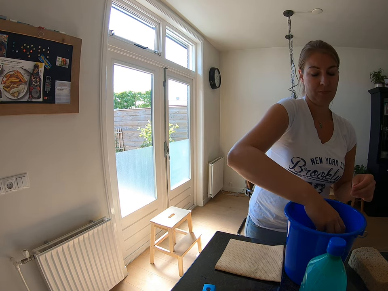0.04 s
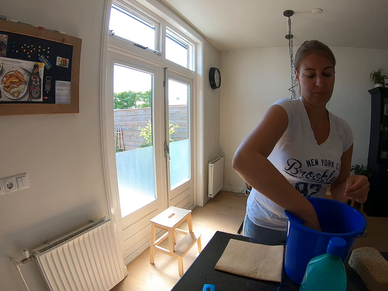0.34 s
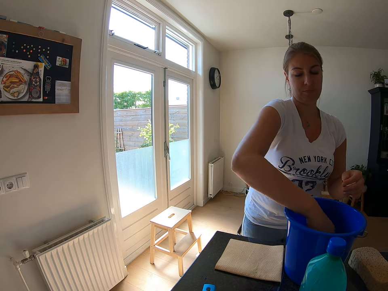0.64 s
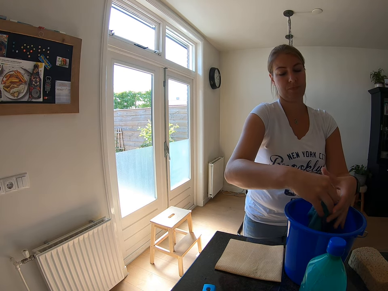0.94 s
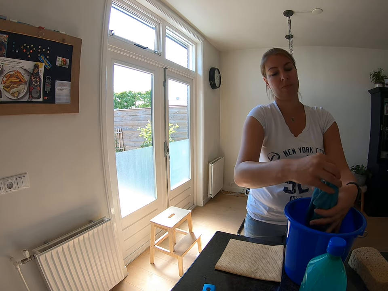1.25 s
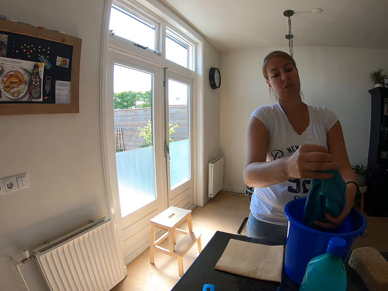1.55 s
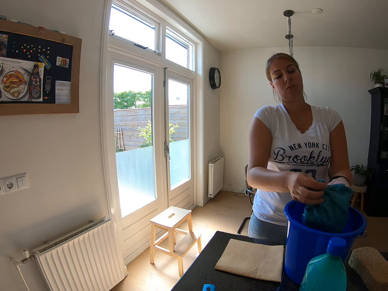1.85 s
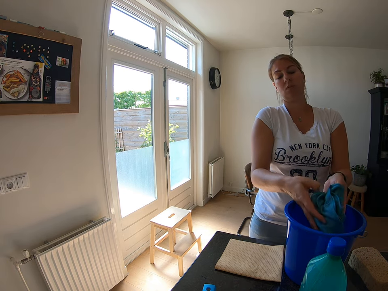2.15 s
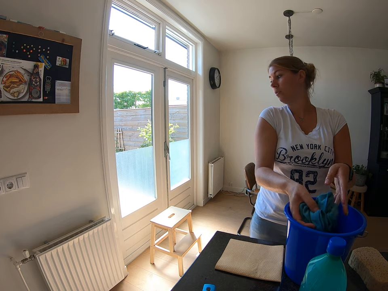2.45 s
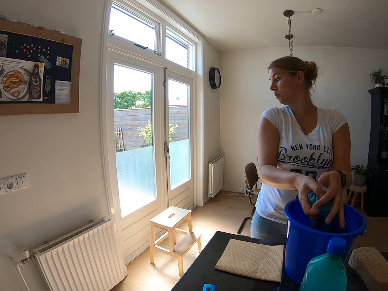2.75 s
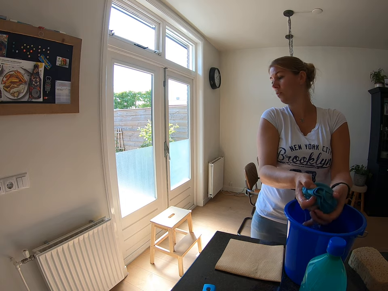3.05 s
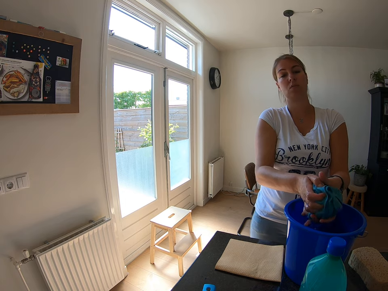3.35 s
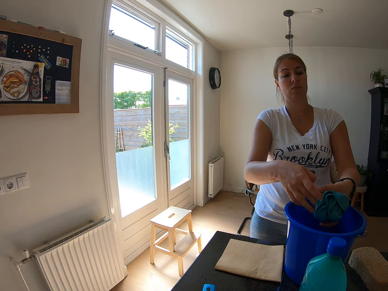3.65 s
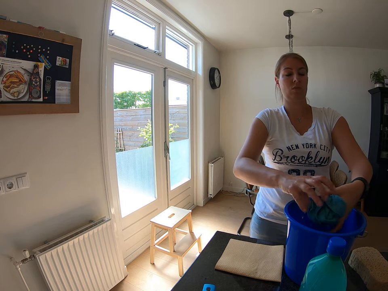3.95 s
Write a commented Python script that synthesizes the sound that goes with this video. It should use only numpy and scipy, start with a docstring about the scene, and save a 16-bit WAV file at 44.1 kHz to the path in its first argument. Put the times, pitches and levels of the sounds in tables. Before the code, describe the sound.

Squelching, bubbling and dripping come from a cloth being swished, raised and wrung over a plastic bucket. The nudged bucket gives low booms on a table, slightly to the right, in a faintly echoing room.

```python
"""First you hear squelching and plopping: a wet cloth is stirred in a plastic bucket of water.
The cloth is then grabbed, lifted, gathered and squeezed. Trapped air rings as bubbles, swarms of tiny
ones make the squelch, and drops slap the surface. The bucket booms on the table when it is pushed.
It stands to the right of the microphones, in a hard-walled room with a faint steady rumble and hiss."""
import sys
import numpy as np
from scipy import signal
from scipy.fft import rfft, irfft
from scipy.io import wavfile
from scipy.ndimage import uniform_filter1d

SR = 44100
rng = np.random.default_rng(int(sys.argv[2]) if len(sys.argv) > 2 else 0)


def int16_out(signal):
    """Quantize to a 16-bit WAV file."""
    q = np.round(np.clip(np.atleast_2d(signal).T, -1, 1) * 32767)
    wavfile.write(sys.argv[1], SR, q.astype(np.int16))


N = 176400  # 4 seconds


def amp(db):
    """Turns decibels into a number to multiply a sound by."""
    return 10 ** (np.asarray(db) / 20)


def unit(x):
    """Scales a signal to an average size (rms) of 1."""
    return x / np.sqrt(np.mean(abs(x) ** 2) + 1e-20)


def read(table, hz, column=1):
    """Looks up a frequency in a table, blending between rows on a musical (log) scale."""
    table = np.array(table)
    return np.interp(np.log(hz + 1), np.log(table[:, 0] + 1), table[:, column])


def colour(x, table):
    """Turns each frequency up or down by a table of (frequency [Hz], gain [dB])."""
    return irfft(rfft(x) * amp(read(table, np.fft.rfftfreq(N, 1 / SR))), N)


def band(x, lo_hz, hi_hz, order=2):
    """Keeps the sound between two frequencies."""
    edges = [lo_hz, min(hi_hz, SR / 2 - 100)]
    return signal.sosfilt(signal.butter(order, edges, "band", fs=SR, output="sos"), x)


def drift(hz):
    """A smooth random wander of average size 1; more hz makes it quicker."""
    keep_slow = np.exp(-(np.fft.rfftfreq(N, 1 / SR) / hz) ** 2)
    return unit(irfft(rfft(rng.standard_normal(N)) * keep_slow, N))


def add(mix, start_s, sound):
    """Mixes a sound in at a given time."""
    part = mix[max(round(start_s * SR), 0):][:len(sound)]
    part += sound[:len(part)]


# Tone of the room's background noise (frequency [Hz], relative level [dB])
ROOM_TONE = [(15, -38), (25, 0.5), (112, -5.5), (191, 9), (278, -9), (573, -19), (790, -9), (952, -19.5),
             (3260, -19), (5010, -22), (5880, -19.5), (12400, -39), (15000, -45)]

def room_tone(level_db=-56.5):
    """A faint steady rumble and hiss, different in each microphone."""
    return amp(level_db) * unit(colour(rng.standard_normal((2, N)), ROOM_TONE))


# How long the room rings (frequency [Hz], time to fade by 60 dB [s])
ROOM_DECAY = [(200, 0.53), (700, 0.33), (1400, 0.46), (4500, 0.35), (8000, 0.46), (15000, 0.32)]

def echoes(tail_db=-4.5, early_db=-5, early_decay_s=0.0041):
    """Sound bounces off the bucket and table first, then dies away between the walls."""
    t = np.arange(SR) / SR
    bounces = rng.standard_normal((2, SR)) * (rng.random((2, SR)) < .1) * (t > .008)
    hz, age, spectrum = signal.stft(bounces, SR, nperseg=256)
    fade = amp(-60 * age / read(ROOM_DECAY, hz)[:, None])
    tail = signal.istft(spectrum * fade, SR, nperseg=256)[1][:, :SR]
    early = rng.standard_normal((2, SR)) * (rng.random((2, SR)) < .06) * (t > .002)
    early *= np.exp(-t / early_decay_s)
    return sum(amp(db) * part / np.linalg.norm(part, axis=1, keepdims=True)
               for db, part in ((tail_db, tail), (early_db, early)))


# Direct sound on the left, compared with the right (frequency [Hz], gain [dB], phase shift [radians])
LEFT_MIC = [(98, -10, 11), (550, -16.5, -2), (1190, -2, -5), (1840, -8.5, -5), (3220, -3, -8),
            (5360, -4.5, -5.5), (11500, -1.5, -4.5)]

def room(direct, echoing, patterns=4, sway_s=.3):
    """Sound reaches two microphones directly, then as echoes that change as the hands and body move."""
    t, hz = np.arange(N) / SR, np.fft.rfftfreq(N, 1 / SR)
    to_left = amp(read(LEFT_MIC, hz)) * np.exp(1j * read(LEFT_MIC, hz, column=2))
    out = np.array([irfft(rfft(direct) * to_left, N), direct])
    for k in range(patterns):  # the echo patterns take turns, all of them once in every sway_s
        from_turn = (t / sway_s * patterns - k) % patterns - patterns / 2
        blend = np.cos(np.pi / 2 * np.clip(from_turn, -1, 1))
        out += signal.fftconvolve((echoing * blend)[None], echoes(), axes=1)[:, :N]
    return out


# How hard the bucket is pushed (time [s], level [dB])
PUSHES = [(0, -56), (.6, -59), (.67, -35.5), (.74, -30.5), (.9, -34.5), (1.08, -40.5), (1.22, -53),
          (1.45, -51), (1.8, -71.5), (1.885, -38.5), (2.1, -68), (2.8, -66), (2.92, -53), (3.08, -50),
          (3.17, -33), (3.33, -28.5), (3.5, -25.5), (3.62, -30.5), (3.79, -32.5), (3.95, -54.5)]
# Deep notes of the bucket and table (pitch [Hz], unsteadiness [Hz], relative level [dB],
# left compared with right [dB], growth with the push [dB per dB])
BOOM_NOTES = [(82.54, 1.83, -1, -25.5, 1), (106.5, 4.4, -11, -9, 2), (192.2, 5.1, -19, -16.5, 0.8)]

def bucket_boom(full_push_db=-25):
    """The pushed bucket booms, and the table carries this mostly to the right microphone."""
    t, out = np.arange(N) / SR, np.zeros((2, N))
    push_db = np.interp(t, *np.transpose(PUSHES)) - full_push_db
    for hz, width_hz, db, left_db, growth in BOOM_NOTES:
        pitch = hz + .5 * width_hz * drift(hz=16)
        waver = amp(np.sqrt(width_hz) * 1.2 * drift(hz=9))
        ring = unit(np.sin(2 * np.pi * np.cumsum(pitch) / SR) * waver)
        sides = amp([[left_db], [0]])
        out += sides * amp(full_push_db + db + growth * push_db) * ring
    return out


# Notes of the bucket's wall and mouth (pitch [Hz], gain of the added ring [dB])
HOLLOW_NOTES = [(194, 25.5), (360, -2), (418, -1.5), (506, 5), (578, -11), (637, -8)]

def hollow_bucket(water, width_hz=5.9):
    """The bucket's wall and the air inside it ring along with the deeper gurgles."""
    return water + sum(amp(db) * signal.lfilter(*signal.iirpeak(hz, hz / width_hz, SR), water)
                       for hz, db in HOLLOW_NOTES)


def splash(lo_hz, hi_hz, decay_s, rise_s=.0005):
    """A puff of spray: a short hiss that swells quickly and dies."""
    t = np.arange(SR // 5) / SR
    noise = rng.standard_normal(len(t))
    shape = (1 - np.exp(-t / rise_s)) * np.exp(-t / decay_s)
    return band(noise * shape, lo_hz, hi_hz, order=3) / np.std(band(noise, lo_hz, hi_hz, order=3))


def bubble(hz, decay_s, swell, rise=0.0097, wobble=0.03):
    """An air pocket rings and fades; its pitch creeps up, and wobbles as it changes shape."""
    age = np.arange(0, 10 * decay_s, 1 / SR) / decay_s  # age and swell are counted in decay times
    shape = (1 - np.exp(-(age / swell) ** 2)) * np.exp(-age)
    pitch = hz * (1 + rise * age + wobble * np.sin(2 * age + 2 * np.pi * rng.random()))
    return shape / shape.max() * np.sin(2 * np.pi * np.cumsum(pitch) / SR)


# Bubbles you can hear one by one (time [s], pitch [Hz], level [dB], decay time [s])
SINGLE_BUBBLES = [(.064, 620, -39.5, 0.004), (.073, 1153, -30, 0.0036), (.095, 2270, -34.5, 0.0027),
                  (.113, 616, -30, 0.0058), (0.123, 194.5, -45, 0.019), (.193, 640, -34, 0.0047),
                  (0.213, 5410, -37, 0.0029), (.222, 545, -45, 0.0093), (.274, 1990, -32, 0.0046),
                  (.612, 545, -42, 0.004), (.626, 498, -31, 0.005), (0.636, 393, -35, 0.0061),
                  (.659, 576, -38.5, 0.0053), (0.864, 1043, -45, 0.0073), (1.192, 4330, -40.5, 0.0022),
                  (1.206, 1216, -34, 0.0027), (1.222, 1065, -33.5, 0.0055), (1.276, 1080, -40.5, 0.0052),
                  (1.432, 4130, -43.5, .003), (1.516, 5740, -41.5, .0025), (1.749, 2686, -36, 0.0053),
                  (1.764, 3500, -40.5, .003), (1.785, 888, -46, 0.011), (1.787, 1350, -38.5, 0.0042),
                  (1.855, 3070, -48, 0.0042), (2.005, 3230, -36.5, 0.0034), (2.040, 1080, -40.5, 0.0064),
                  (2.062, 1450, -40.5, 0.003), (2.082, 2350, -36, 0.0044), (2.194, 1447, -33, 0.0039),
                  (2.195, 1745, -37, 0.0033), (2.289, 1210, -29.5, 0.0055), (2.363, 3290, -38.5, 0.0021),
                  (2.835, 3190, -44, 0.0043), (2.857, 1542, -46, 0.0074), (2.944, 1670, -40, 0.0063),
                  (2.995, 1298, -37.5, 0.0042), (3.017, 1577, -41, 0.012), (3.041, 2870, -36.5, 0.0031),
                  (3.099, 1910, -24.5, 0.0013), (3.109, 1727, -35, 0.0068), (3.134, 700, -32.5, 0.0044),
                  (3.214, 1823, -38.5, 0.006), (3.225, 2180, -37.5, 0.0031), (3.281, 1480, -38, 0.0024),
                  (3.301, 5400, -36.5, 0.005), (3.365, 2560, -35.5, 0.0015), (3.385, 582, -40.5, 0.0054),
                  (3.391, 1586, -38, 0.007), (3.423, 608, -32.5, 0.0051), (3.755, 2850, -50.5, 0.0052),
                  (3.808, 1694, -49, 0.0063), (3.823, 1457, -46.5, 0.018), (3.82, 2870, -43, 0.004)]
# Slaps and spits of water (time [s], level [dB], middle frequency [Hz], decay time [s], width [octaves])
WATER_SLAPS = [(0.102, -36, 3760, 0.0045, 1.88), (.191, -36.5, 2780, 0.0075, 0.57),
               (0.213, -37.5, 2970, 0.0072, 0.99), (.275, -35.5, 2800, 0.0073, 1.04),
               (0.285, -41, 6840, 0.0046, 1.08), (.367, -45, 4020, 0.015, 1.13),
               (0.623, -49, 645, 0.005, 1.8), (0.63, -59.5, 1310, 0.19, 0.7),
               (.842, -50.5, 3030, 0.0071, 2.8), (1.205, -50, 2900, 0.032, 3),
               (1.361, -44, 2880, 0.016, 1.75), (1.495, -40.5, 4400, 0.0043, 0.77),
               (1.613, -42.5, 6000, 0.005, 0.61), (1.824, -42, 2570, 0.02, 2.4),
               (2.042, -39.5, 2400, 0.0065, 1.07), (2.238, -41, 6800, 0.014, 0.36),
               (2.495, -46, 2710, 0.056, 1.07), (2.730, -38.5, 3320, 0.0021, 0.48),
               (2.835, -37, 5900, 0.0053, 0.48), (2.866, -37, 6060, 0.0062, 0.56),
               (2.938, -40, 5830, 0.0084, 0.26), (3.100, -33, 2440, 0.0032, 3.1),
               (3.255, -48.5, 8850, 0.006, 0.95), (3.299, -41.5, 2660, 0.0079, 2.9),
               (3.372, -35.5, 4800, 0.0071, 1.4), (3.568, -39.5, 6100, 0.0068, 0.15)]

def plops(pop_db=-10.5, pop_decay_s=0.0055):
    """Small splashes each trap a bubble that rings, and falling water slaps the surface."""
    out = np.zeros(N)
    for start_s, hz, db, decay_s in SINGLE_BUBBLES:
        add(out, start_s, amp(db) * bubble(hz, decay_s, swell=0.54))
        add(out, start_s, amp(db + pop_db) * splash(hz * 0.77, hz * 1.65, pop_decay_s))
    for start_s, db, hz, decay_s, octaves in WATER_SLAPS:
        spread = 2 ** (octaves / 2)
        add(out, start_s, amp(db) * splash(hz / spread, hz * spread, decay_s))
    return out


# Tone of the squelch (frequency [Hz], relative gain [dB])
SQUELCH_TONE = [(330, 1), (600, -5), (800, -3), (1100, -3.5), (1800, 0.5), (2400, -1), (3200, 5.5),
                (4600, -1.5), (6300, 5.5), (7800, -2.5), (9000, -9.5), (12000, -23), (15500, -23)]

def bubble_swarm(lo_hz, hi_hz, per_s, cycles, sizes=72, spread_db=4.5, cluster_db=2, film_db=-9):
    """Many tiny bubbles burst over the hiss of a thin film of water."""
    swarm = np.zeros(N)
    per_size = int(per_s * N / SR / sizes) + 1
    for pitches in np.array_split(np.geomspace(lo_hz, hi_hz, sizes), sizes // 6):
        cluster = amp(cluster_db * drift(hz=24.2))  # bubbles of similar size swell and fade together
        for hz in pitches:
            when, strength, sign = rng.random((N // 100, 3))[:per_size].T
            burst_db = spread_db * np.minimum(-np.log(1 - strength), 3)  # many soft, a few loud
            bursts = np.zeros(N)
            bursts[(when * N).astype(int)] = np.sign(sign - .5) * amp(burst_db)
            ring = bubble(hz, cycles / hz, swell=0.37)
            swarm += signal.oaconvolve(bursts * cluster, ring)[:N] * hz
    film = amp(film_db) * unit(band(rng.standard_normal(N), lo_hz, hi_hz))
    squelch = unit(colour(unit(swarm) + film, SQUELCH_TONE))
    loudness = np.sqrt(uniform_filter1d(squelch ** 2, size=2600) + 0.024)
    return squelch / loudness  # evened out, so the hand moves can set the level


# How loud the cloth is in each move of the hands (time [s], gurgle [dB], splash [dB], fizz [dB])
STIRRING = [(0.0, -53, -47, -48), (0.036, -64, -59.5, -61), (0.114, -46, -50, -49.5),
            (0.162, -52, -54, -60), (0.192, -37.5, -51.5, -47), (0.27, -54, -49.5, -51.5),
            (0.38, -60.5, -56, -63), (0.538, -58.5, -70, -104), (0.58, -56.5, -97, -99)]
GRABBING = [(0.76, -63, -59, -62), (0.822, -61, -73, -69), (0.87, -74, -53.5, -59.5),
            (1.118, -69, -85, -93), (1.15, -100, -80, -57)]
LIFTING = [(1.21, -73, -49, -41), (1.218, -68, -48.5, -54.5), (1.3, -86, -62, -65.5),
           (1.352, -47, -63, -59), (1.372, -49, -51.5, -54.5), (1.676, -61, -55, -56),
           (1.686, -54, -45.5, -53.5), (1.738, -74, -62, -59.5), (1.75, -66, -53.5, -57),
           (1.838, -53.5, -46.5, -49), (1.958, -70, -59, -57), (2.016, -60, -57, -50.5),
           (2.093, -49, -48.5, -53.5), (2.178, -75, -58, -49)]
GATHERING = [(2.182, -71, -52, -53.5), (2.26, -53.5, -59, -55), (2.33, -52.5, -64, -59),
             (2.48, -74, -71, -60.5), (2.52, -52, -56.5, -52), (2.64, -88, -64.5, -67),
             (2.759, -68, -60, -61), (2.8, -57.5, -85, -57.5)]
SQUEEZING = [(2.936, -85, -59.5, -56), (3.05, -57.5, -48.5, -51), (3.09, -49, -54, -50.5),
             (3.13, -49, -45.5, -52), (3.2, -53.5, -58, -57), (3.27, -61, -55, -54),
             (3.301, -45.5, -41.5, -49.5), (3.345, -48.5, -54.5, -53), (3.38, -56, -45.5, -45),
             (3.43, -48.5, -64, -55), (3.469, -55, -59, -48), (3.54, -58.5, -61.5, -59.5),
             (3.7, -88, -77, -63), (3.952, -62, -68, -65)]
# Bubble swarms for gurgle, splash and fizz, one row each
# (lowest pitch [Hz], highest pitch [Hz], bubbles [per s], decay time [cycles], added gain [dB])
SWARMS = [(323.6, 1044, 500, 2.05, -6), (855, 2486, 700, 2.46, -0.5), (2670, 14440, 2000, 5.7, 1)]

def wet_cloth():
    """Water squelches out of the cloth with each move of the hands."""
    t, out = np.arange(N) / SR, np.zeros(N)
    moves = [np.array(move) for move in (STIRRING, GRABBING, LIFTING, GATHERING, SQUEEZING)]
    for column, (lo_hz, hi_hz, per_s, cycles, db) in enumerate(SWARMS, start=1):
        level = sum(amp(np.interp(t, move[:, 0], move[:, column], -np.inf, -np.inf)) for move in moves)
        smooth_level = uniform_filter1d(level, size=200)
        out += amp(db) * smooth_level * bubble_swarm(lo_hz, hi_hz, per_s, cycles)
    return out


def scene(drop_echo_db=-1):
    """Drops and cloth sound in the bucket and the room, over the boom and the background noise."""
    background = room_tone()
    drops = hollow_bucket(plops())
    squelch = hollow_bucket(wet_cloth())
    echoing = amp(drop_echo_db) * drops + squelch  # drops in the open echo less than cloth in the bucket
    return room(drops + squelch, echoing) + bucket_boom() + background


def record(dry, top_hz=15750):
    """Cuts off the very highest treble."""
    low_pass = signal.firwin(511, top_hz, window=("kaiser", 9), fs=SR)
    return signal.oaconvolve(dry, low_pass[None], "same")


dry = scene()
out = record(dry)
int16_out(out)
```